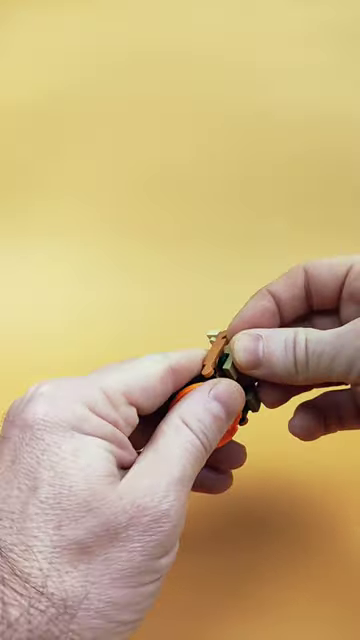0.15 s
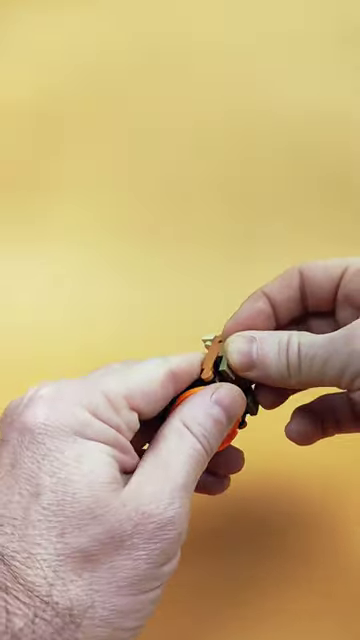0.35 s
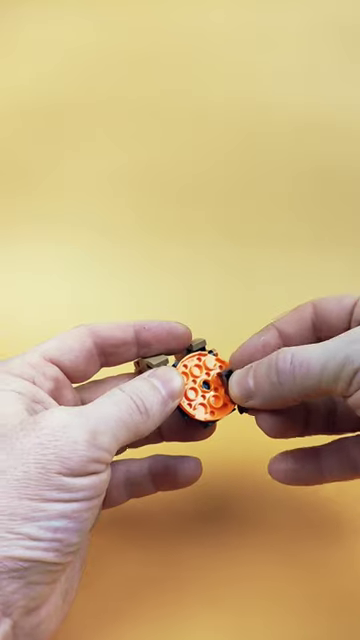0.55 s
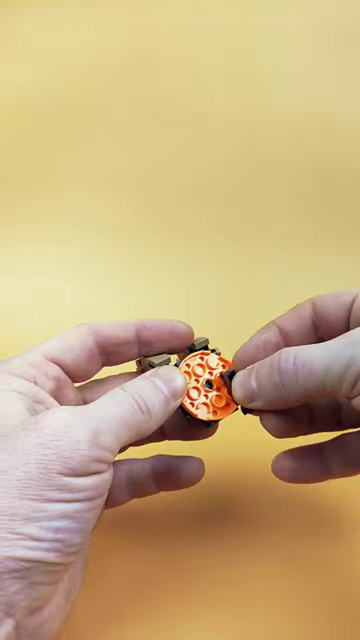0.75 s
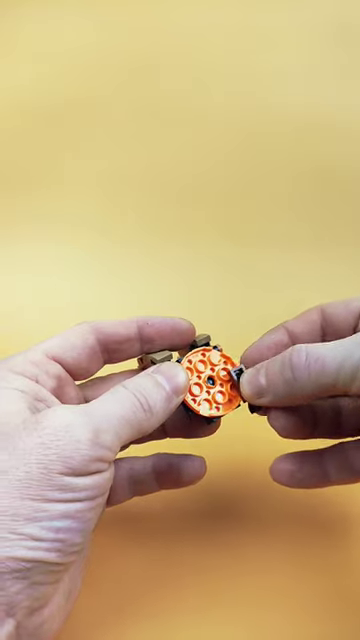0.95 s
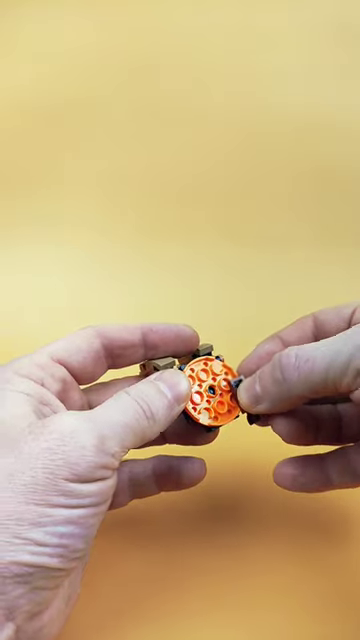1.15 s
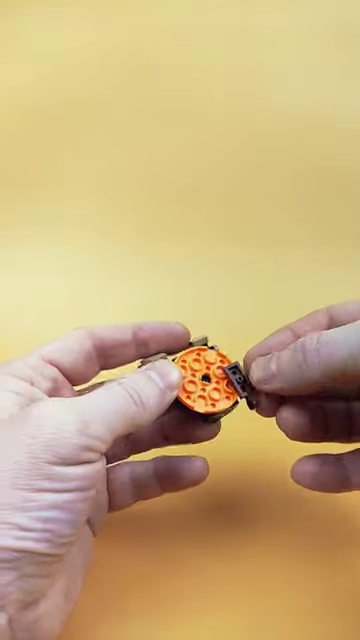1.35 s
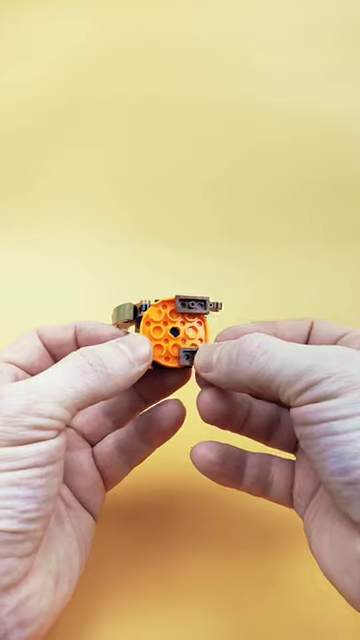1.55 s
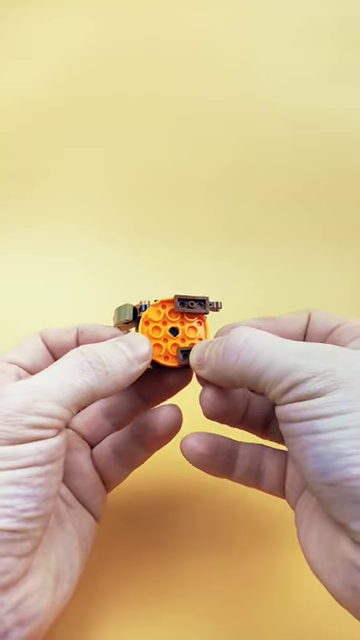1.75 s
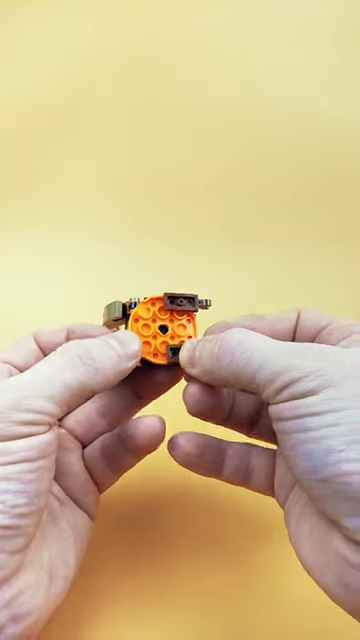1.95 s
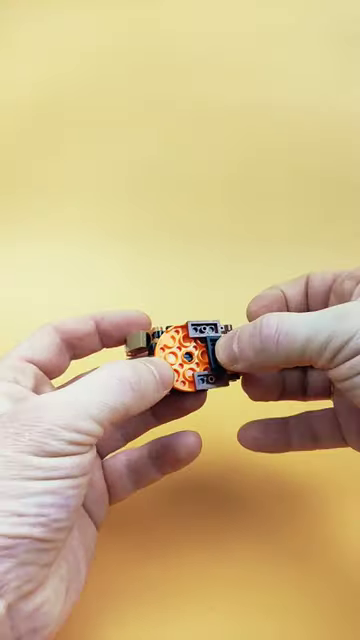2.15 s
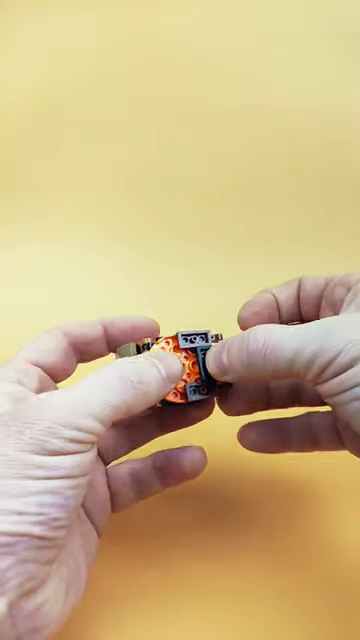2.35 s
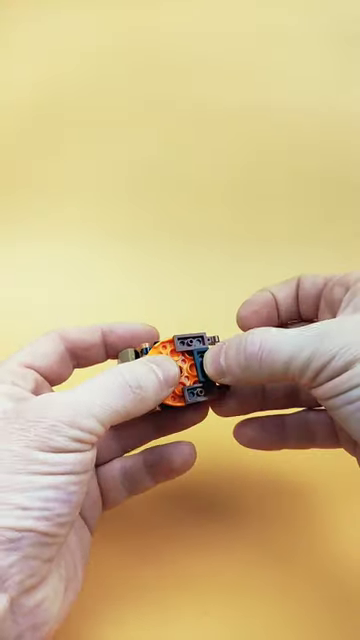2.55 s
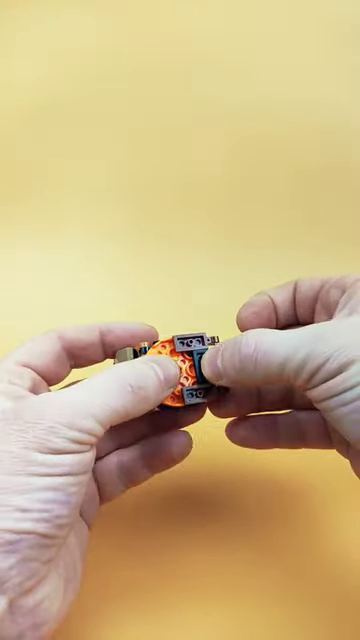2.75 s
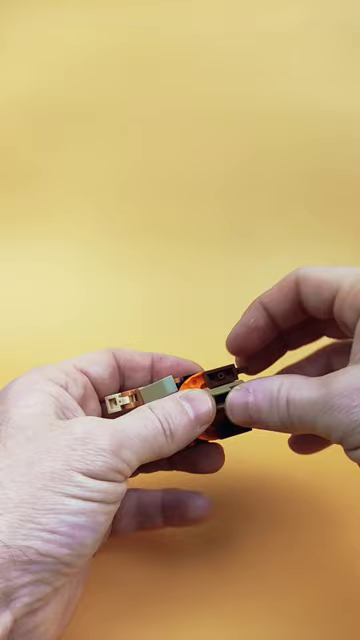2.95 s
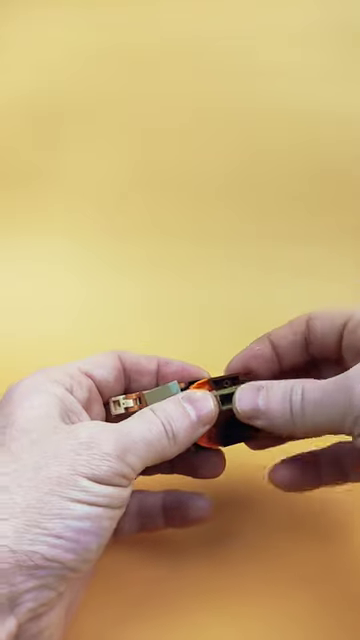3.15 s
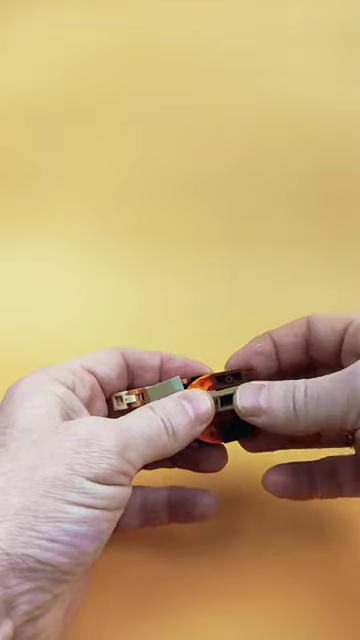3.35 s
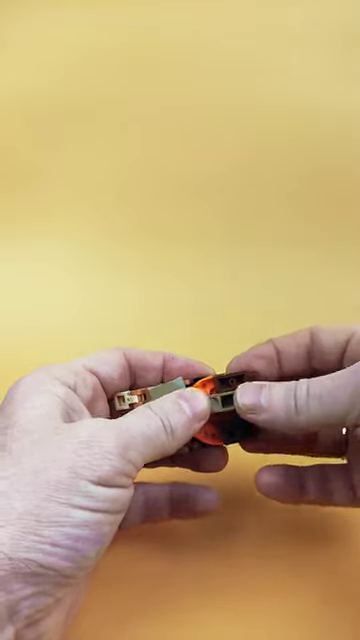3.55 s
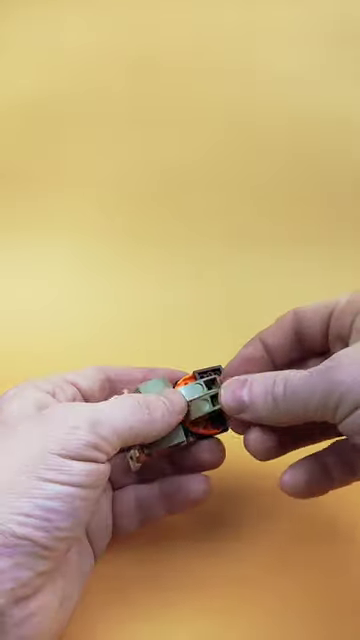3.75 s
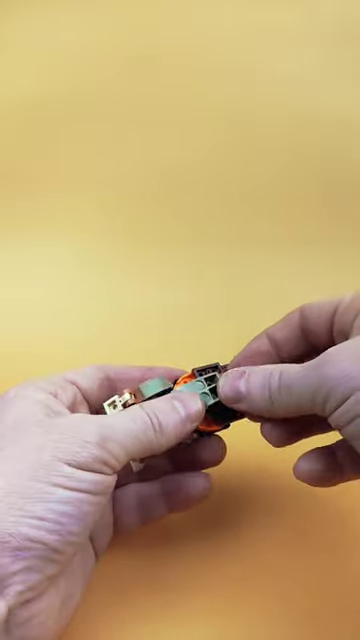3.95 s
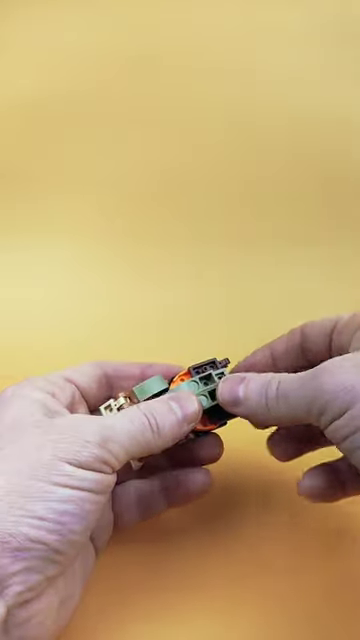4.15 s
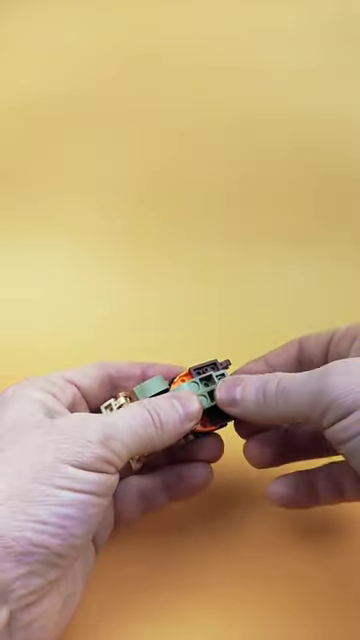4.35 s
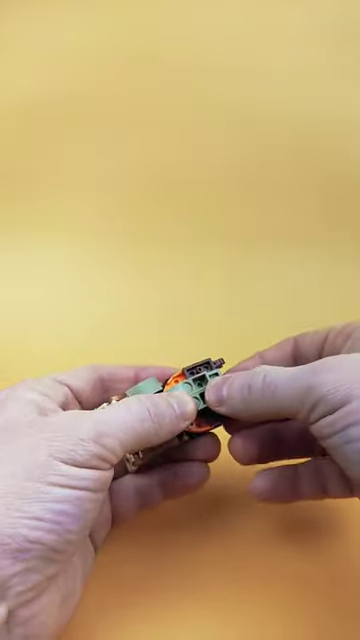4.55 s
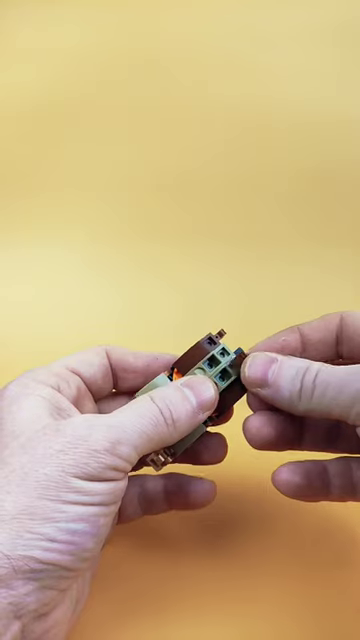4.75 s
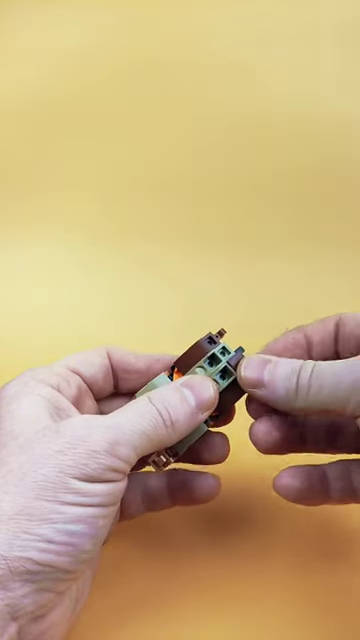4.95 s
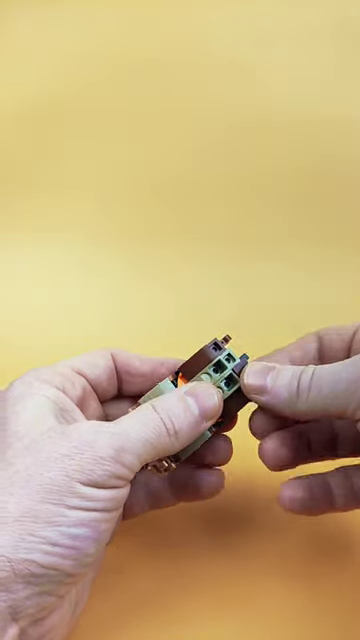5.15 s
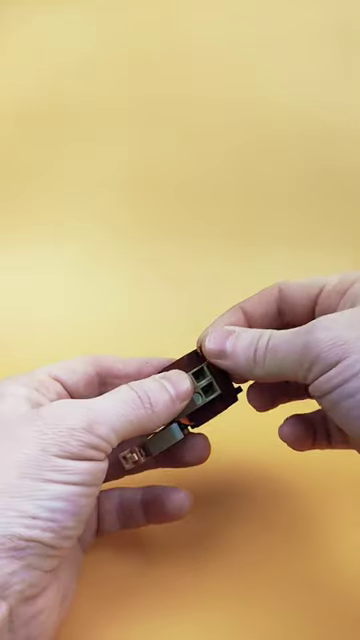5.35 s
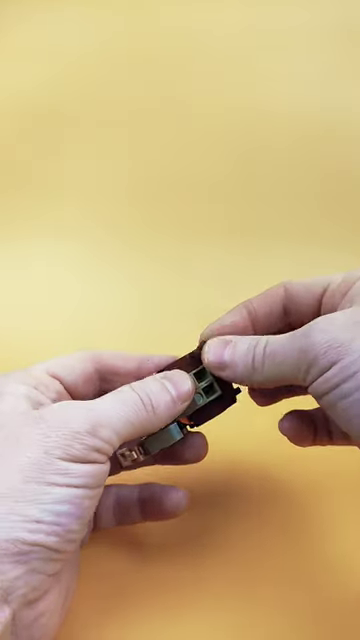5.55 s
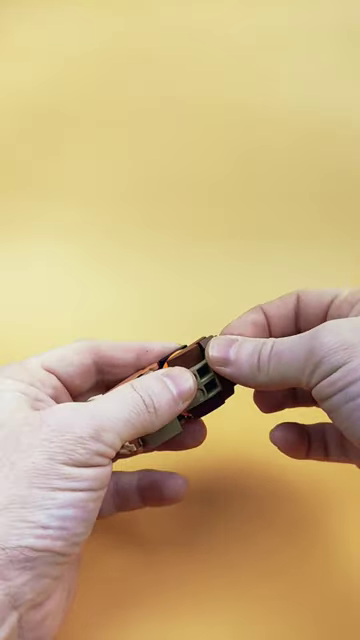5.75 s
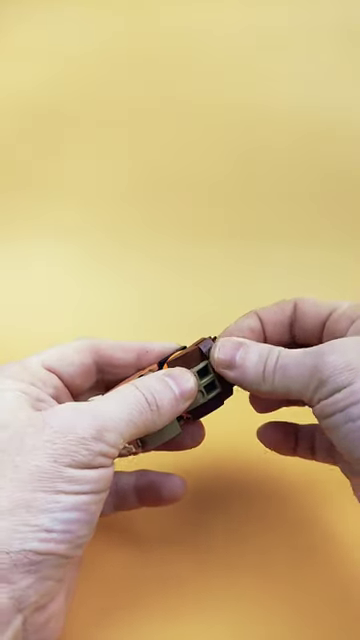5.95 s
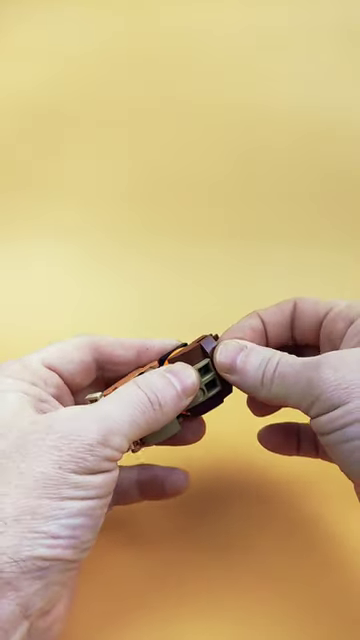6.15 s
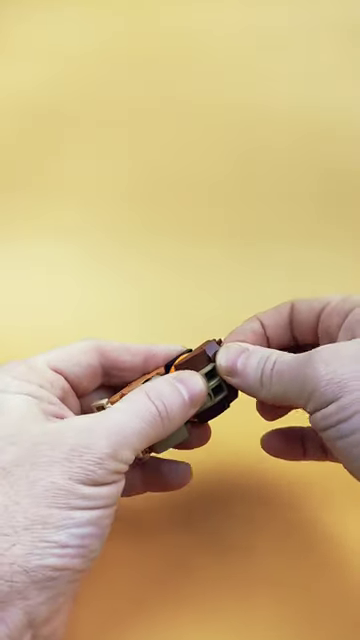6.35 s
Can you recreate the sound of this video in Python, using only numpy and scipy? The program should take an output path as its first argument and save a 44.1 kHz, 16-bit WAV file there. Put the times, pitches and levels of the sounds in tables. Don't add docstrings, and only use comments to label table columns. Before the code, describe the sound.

Very close stereo sound of small plastic bricks being pressed together in a quiet room. At 0.05 s a very loud, bright snap overloads the microphones, with a dull low bump, then light ticks and finger rubs until about 0.4 s. A soft snap comes at 0.9, medium ones at 1.6 and 2.7, a firm one at 3.5. Between them are faint skin strokes and grazes; around 3.7 to 4.2 tiny ticks cluster together. A medium snap at 4.5 is followed by a tiny gap of silence near 4.7 and a soft snap at 4.95. At 5.24 a very loud snap is chopped off almost instantly by another brief silence. A loud snap follows at 5.7, then faint rubs and a soft final click at 6.35. Snaps are dry, treble-heavy and slightly left, with short hollow rings over faint still air.

```python
import sys
import numpy as np
from scipy import signal
from scipy.fft import rfft, irfft, next_fast_len
from scipy.io import wavfile
from scipy.ndimage import uniform_filter1d, minimum_filter1d, map_coordinates

SR = 44100
rng = np.random.default_rng(int(sys.argv[2]) if len(sys.argv) > 2 else 0)


def field_ratio(decibels):
    return 10 ** (np.asarray(decibels, dtype=float) / 20)


def to_wav(sig):
    pcm = np.clip(np.atleast_2d(sig), -1, 1) * 32767
    pcm = np.round(pcm).astype(np.int16)
    wavfile.write(sys.argv[1], SR, pcm.T)


N = 281799
SPAN = 16384
HZ = np.fft.rfftfreq(SPAN, 1 / SR)

# time in seconds, peak in dB, left minus right in dB, ring in Hz,
# edge (crispness) in dB.
STUD_SNAPS = [
    (0.0516, -1, -1.5, 9760, -10),
    (0.8918, -18.5, -8.5, 7450, -51),
    (1.5812, -12.5, -7, 7920, -56),
    (2.6702, -13.5, -2.5, 7800, -11),
    (3.5183, -10, 0, 9160, -26.5),
    (4.4706, -12.5, -3.5, 7740, -21),
    (4.9441, -16, -2.5, 8770, -34),
    (5.2438, -1, -5.5, 8300, -31),
    (5.7138, -4.5, -5.5, 8600, -36.5),
    (6.354, -18, 0, 7060, -14.5),
]
# time in seconds, peak in dB, left minus right in dB, ring in Hz,
# edge (crispness) in dB.
BRICK_TICKS = [(0.137, -34.5, 1, 9700, -39), (0.297, -38.5, -2, 9300, -28), (0.3072, -37.5, -1, 9780, -23),
               (1.5927, -26, 3, 8440, -22), (3.7741, -34, -7, 8400, -45), (3.7939, -37.5, -9.5, 8300, -37),
               (3.86, -36, 6.5, 8500, -16.5), (4.0896, -36, -3, 8150, -34), (4.1044, -38, -10, 7500, -22),
               (4.108, -32.5, -2, 7250, -25.5), (4.1957, -44.5, -1, 7670, -12),
               (4.713, -46.5, -1, 8600, -8.5), (4.89, -43, -1, 8420, -16), (4.8988, -40, -2.0, 8340, -14),
               (5.4475, -41.5, -6.5, 7640, -29), (5.906, -39, -3, 8700, -20)]
# time in seconds, peak in dB, left minus right in dB.
FAINT_TICKS = [(0.3732, -52.5, -1), (2.397, -52, -4), (3.2256, -51, -5.5), (3.6864, -49.5, -13),
               (3.8347, -46, -1.5), (4.2252, -51.5, 4), (4.8524, -53, -5), (5.578, -49.5, 0.5),
               (5.6451, -47, 4.5), (5.6912, -48.5, 5), (6.0000, -49.5, -1.5)]
# time in seconds, brick wall in dB, wall in Hz,
# knock of the whole build in dB, knock in Hz.
BRICK_ANSWERS = [(0.0533, -30, 5340, -50.5, 650), (0.3073, -51.5, 4430, -54.5, 789),
                 (0.8934, -37.5, 3935, -54.5, 1550), (1.5816, -35.5, 4300, -54, 2055),
                 (1.5915, -33, 4890, -54, 770), (2.6709, -28.5, 4650, -49, 1700),
                 (3.5184, -30.5, 3680, -42, 1747), (4.0876, -51, 5210, -56.5, 1880),
                 (4.4718, -25, 4990, -42.5, 1780), (4.9436, -33.5, 4610, -48, 1620),
                 (5.244, -25.5, 4810, -44, 746), (5.7139, -31, 4990, -54, 1620),
                 (6.354, -33.5, 4374, -40, 1524)]
# time in seconds, level in dB.
FINGER_THUMPS = [(0.0529, -52), (0.3073, -56), (0.8934, -64), (2.6709, -49.5), (4.4718, -42.5),
                 (4.7117, -60), (4.9436, -55.5), (5.244, -47), (5.7139, -66), (6.354, -46)]
# start in seconds, held in seconds, level in dB,
# left minus right in dB.
FINGER_RUBS = [(0.15, 0.0062, -50, -0.5), (0.2, 0.068, -65.5, 0), (0.305, 0.0058, -57.5, -4),
               (0.5, 0.027, -71, -6.5), (1.19, .012, -72.5, -3), (1.275, .012, -72, -6),
               (1.35, .05, -69, -3.5), (1.85, .03, -70, 0), (2.3, 0.04, -61.5, -.7), (2.4, .015, -59, -1.5),
               (2.5, 0.023, -67.5, 2.5), (2.959, 0.016, -64, -2.5), (3.145, 0.083, -65.5, -3),
               (3.265, 0.087, -70.5, -3), (3.685, 0.021, -63, -2), (3.76, .008, -61, -7),
               (3.87, 0.015, -60.5, -6), (3.97, 0.016, -59, -3), (4.05, 0.069, -59.5, -3),
               (4.196, 0.041, -68, -7.5), (4.335, 0.058, -65.5, -3), (4.7, .04, -66, -1),
               (4.79, .07, -65.5, -3), (4.89, 0.056, -59, -3), (5.09, 0.0076, -64, -3),
               (5.145, 0.036, -61.5, 2), (5.43, .025, -67, -1), (5.58, 0.16, -63, -0.5),
               (5.908, 0.0091, -65, -9), (6.02, 0.064, -65.5, -2)]
# centre in Hz, width in Hz, level in dB.
PORT_RINGS = [
    [(7750, 1100, -10), (10270, 1400, 6.5), (14120, 1200, -8)],
    [(6973, 820, -2), (8400, 840, 9.5), (13510, 830, -26.5)],
]
# frequency in Hz, time to fall by 60 dB in seconds.
ROOM_DECAY = [(500, 0.67), (2000, .25), (5000, 0.27), (9000, 0.19), (14000, 0.21)]
# frequency in Hz, level in dB per Hz.
AIR_COLOUR = [(2, -23.5), (5, 6), (16, 2.5), (38, -16), (100, -20), (300, -28), (700, -34.5), (1700, -38.5),
              (4000, -42), (9000, -44.5), (14000, -45)]
# time in seconds, left height, right height (full scale is 1), rise in
# seconds, fall in seconds.
LEVEL_JUMPS = [
    (0.0542, -0.07, -0.014, 0.00017, 0.014),
    (0.13, 0.13, 0.0097, 0.013, 0.025),
    (0.391, 0.011, 0.002, 0.000056, 0.014),
    (1.0191, 0.0053, 0.0054, 0.00015, 0.0012),
    (1.4298, -0.0025, -0.001, 0.0001, 0.042),
    (2.148, -0.00038, -0.0043, .0001, 0.037),
    (2.1549, 0.0087, -0.0017, 0.00011, 0.042),
    (3.6665, .0038, 0.0018, 0.000079, 0.026),
]
# time in seconds, silence in seconds, fade-in in seconds.
SILENCES = [
    (4.6695, .0105, .004),
    (5.2495, .0105, .008),
]
# frequency in Hz, level in dB.
TOP_END = [(14200, 0), (14450, -24), (15200, -36), (16400, -40), (16700, -100)]


def unit(x):
    return x / np.sqrt(np.mean(x ** 2, axis=-1, keepdims=True) + 1e-20)


def along(points, hz):
    f, v = np.transpose(points)
    return np.interp(np.log(hz + 1), np.log(f + 1), v)


def two_sides(pan_db):
    return np.array([[pan_db], [-pan_db]]) / 2


def resonances(modes, f):
    return sum(field_ratio(db) * 1j * f * w / (c * c - f * f + 1j * f * w) for c, w, db in modes)


def filtered(x, response):
    m = next_fast_len(N + SR // 2)
    return irfft(rfft(x, m) * response(np.fft.rfftfreq(m, 1 / SR)), m)[..., :N]


def studs(events, length_s, width_hz, lift_db):
    out = np.zeros((2, N))
    bend = HZ / 5500
    thin = bend ** 2 / (1 - bend ** 2 + 1.2j * bend)
    for s, db, pan_db, ring_hz, edge_db in events:
        width = np.clip(width_hz * field_ratio(0.3 * (edge_db + 25)), 300, 6000)
        ring = resonances([(ring_hz, width, 0)], HZ) * resonances([(ring_hz, 6000, 0)], HZ)
        ring = ring + resonances([(10300, 3400, 0.5 * edge_db), (13370, 2200, edge_db + 12)], HZ)
        slips = chatter(length_s, spiky_db=7.5, burst_db=4.0, blow=12)
        out = place(out, s, slips * ring * thin * ports(HZ), db + lift_db + two_sides(pan_db))
    return out


def bodies():
    out = np.zeros((2, N))
    answers = list(BRICK_ANSWERS)
    for s, db, _, _, edge_db in BRICK_TICKS:
        db = db - 4 + 0.52 * edge_db
        answers.append((s, db, 4620, db - 16, 744))
    for s, wall_db, wall_hz, knock_db, knock_hz in answers:
        wall = resonances([(0.72 * wall_hz, 700, -8), (wall_hz, 1100, 1), (1.5 * wall_hz, 900, -10)], HZ)
        wall = wall * resonances([(wall_hz, 3500, 0)], HZ)
        slips = chatter(0.013, spiky_db=2.0, burst_db=0.5, blow=5.4)
        out = place(out, s, slips * wall, wall_db + 17)
        knock = resonances([(0.48 * knock_hz, 300, -5), (knock_hz, 300, 0), (2.1 * knock_hz, 400, -7)], HZ)
        knock = knock * resonances([(knock_hz, 2500, 0)], HZ)
        out = place(out, s, push(0.00094, 0.00044) * knock, knock_db + 20)
    for s, db in FINGER_THUMPS:
        thump = resonances([(129.9, 230, 0)], HZ) ** 2
        out = place(out, s, push(0.00094, 0.00044) * thump, db + 20)
    return out


def push(delay_s, spread_s):
    return np.exp(-2j * np.pi * HZ * (delay_s + spread_s * rng.random((2, 1))))


def chatter(length_s, spiky_db, burst_db, blow):
    creep_s = 0.0017
    t = np.arange(SPAN) / SR
    bursts = map_coordinates(rng.standard_normal(SPAN // 20), [np.arange(SPAN) / 32])
    spikes = spiky_db * np.minimum(rng.exponential(size=SPAN), 3.5)
    shape = np.where(t < creep_s, 0.73 * (t / creep_s) ** 4, 1)
    shape = shape * field_ratio(-60 * t / np.clip(length_s, 0.003, 0.06))
    slips = rfft(shape * field_ratio(burst_db * bursts + spikes) * rng.standard_normal((2, SPAN)))
    return slips + blow * push(creep_s, 0.0003017)


def place(out, s, spectrum, db):
    size = np.sqrt(np.sum(irfft(spectrum) ** 2, axis=1, keepdims=True))
    sound = irfft(spectrum * (1 + room())) / size * field_ratio(db)
    for cut, _, _ in SILENCES:
        if cut > s:
            sound[:, round((cut - s) * SR):] = 0
    return out + np.pad(sound, ((0, 0), (round(s * SR), N)))[:, :N]


def fingers():
    t = np.arange(N) / SR
    level = np.zeros((2, N))
    for s, held, db, pan_db in FINGER_RUBS:
        swell_db = 452 * np.maximum(s - t, 0)
        fade_db = 305.5 * np.maximum(t - s - held, 0)
        level = np.hypot(level, field_ratio(db - swell_db - fade_db) * field_ratio(two_sides(pan_db)))
    clumps = map_coordinates(rng.standard_normal(N // 100 + 4), [np.arange(N) / 150])
    grains = rng.standard_normal((2, N)) * field_ratio(3.8 * clumps)
    skin = [(4576, 2000, -3.5), (8800, 5400, 5.5), (12940, 1300, -6.5)]
    return level * unit(filtered(grains, lambda f: ports(f) * resonances(skin, f)))


def ports(f):
    return np.array([1 + resonances(port, f) for port in PORT_RINGS])


def room():
    hz, t, z = signal.stft(rng.standard_normal((2, SPAN)), SR, nperseg=128)
    fading = z * field_ratio(-60 * t / along(ROOM_DECAY, hz)[:, None])
    walls = signal.istft(fading, SR, nperseg=128)[1][:, :SPAN]
    t = np.arange(SPAN) / SR
    near = rng.standard_normal((2, SPAN)) * field_ratio(-60 * t / 0.026) * (t > 0.001)
    return rfft(field_ratio(-20.5) * near + field_ratio(-39.0) * walls * (t > 0.004))


def hush():
    noise = rng.standard_normal((2, N))
    air = filtered(noise, lambda f: field_ratio(along(AIR_COLOUR, f)) * np.abs(ports(f)) ** 0.67)
    return field_ratio([[-52], [-54]]) * unit(air)


def jumps():
    out = np.zeros((2, N + SR))
    t = np.arange(SR // 4) / SR
    for s, left, right, rise, fall in LEVEL_JUMPS:
        step = (1 - np.exp(-t / rise)) * np.exp(-t / fall)
        start = round(s * SR)
        out[:, start:start + len(t)] += np.outer([left, right], step)
    return out[:, :N]


def scene():
    faint_ticks = [(*row, 8500, -18) for row in FAINT_TICKS]
    snaps = studs(STUD_SNAPS, length_s=0.0097, width_hz=2520, lift_db=14)
    ticks = studs(BRICK_TICKS + faint_ticks, length_s=0.012, width_hz=1300, lift_db=13)
    return snaps + ticks + bodies() + fingers() + hush()


def roll_off(x):
    return signal.sosfilt(signal.butter(12, 16540, fs=SR, output="sos"), x)


def record(dry):
    ceiling = 0.78
    peak = -minimum_filter1d(-np.abs(dry), size=45)
    crest = uniform_filter1d(peak, size=45)
    limited = dry / (1 + (crest / ceiling) ** 6) ** (1 / 6)
    x = filtered(limited, lambda f: field_ratio(along(TOP_END, f))) + jumps()
    t = np.arange(N) / SR
    for cut, silent, fade in SILENCES:
        fade_out = np.clip((cut - t) / 0.00048, 0, 1)
        fade_in = np.clip((t - cut - silent) / fade, 0, 1)
        x = x * np.where(t < cut, fade_out, fade_in)
    return roll_off(x)


dry = scene()
out = record(dry)
to_wav(out)
```